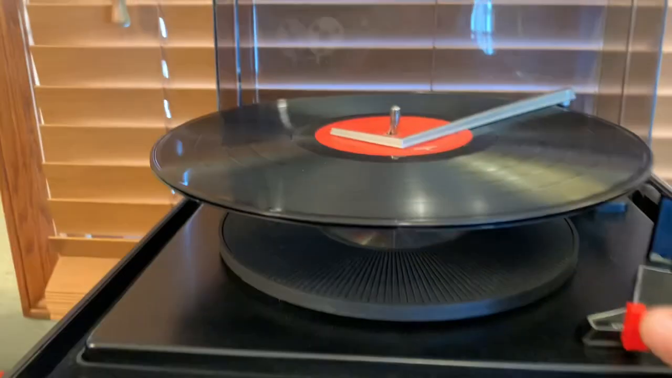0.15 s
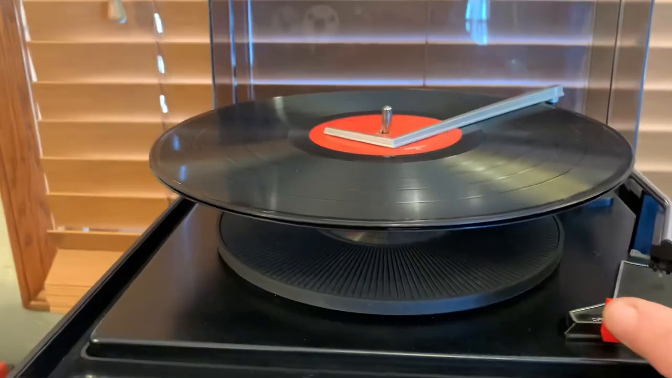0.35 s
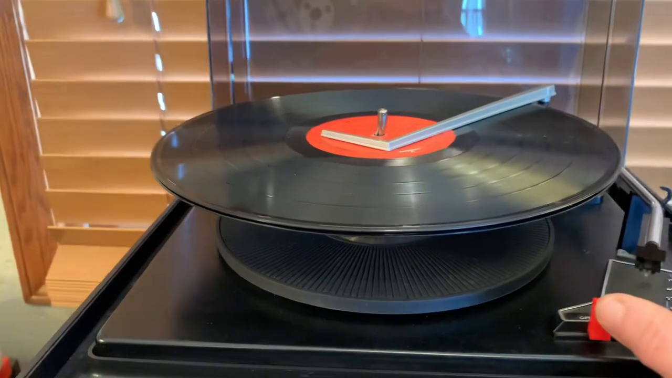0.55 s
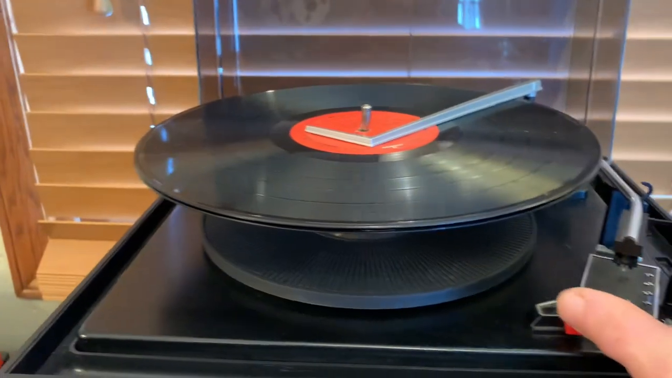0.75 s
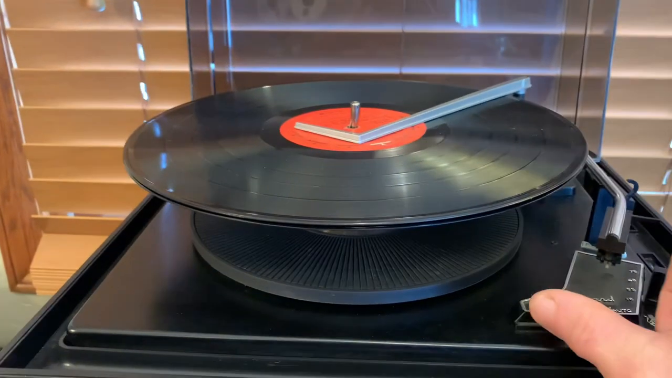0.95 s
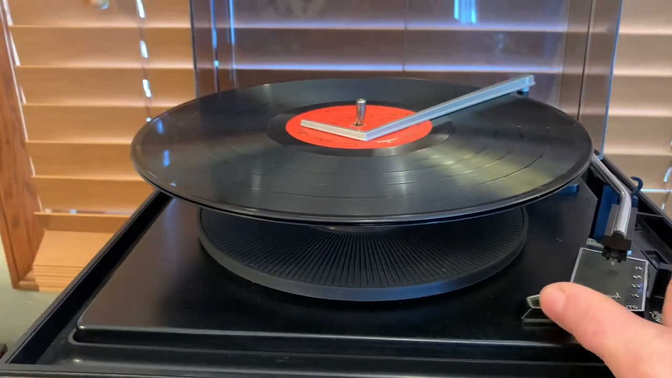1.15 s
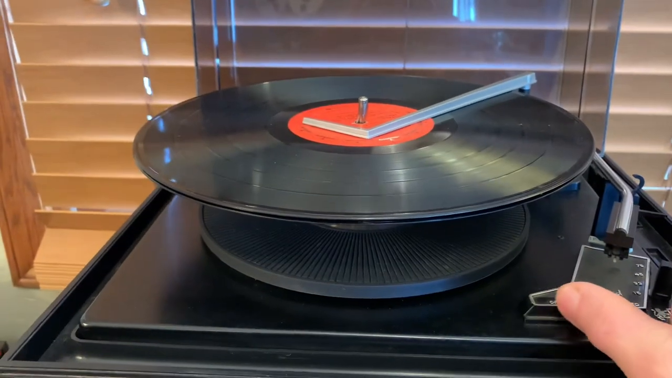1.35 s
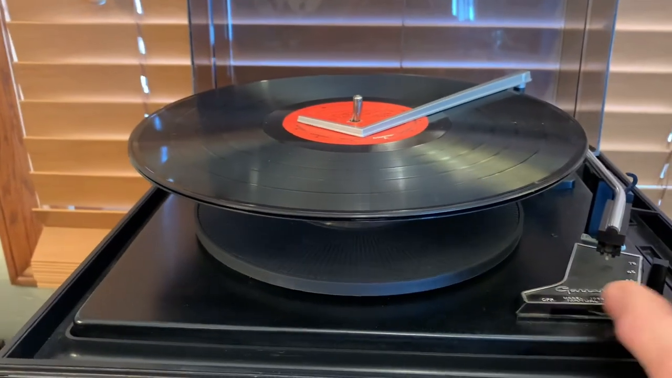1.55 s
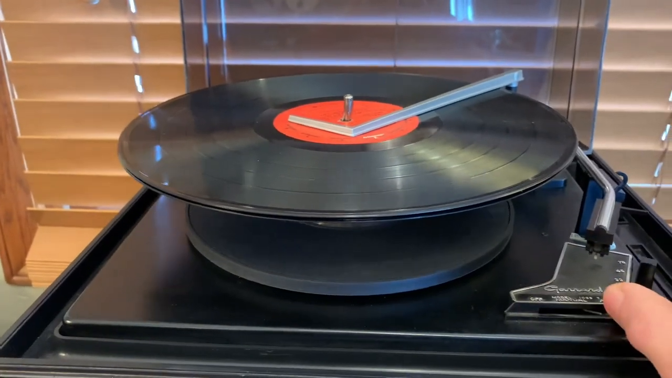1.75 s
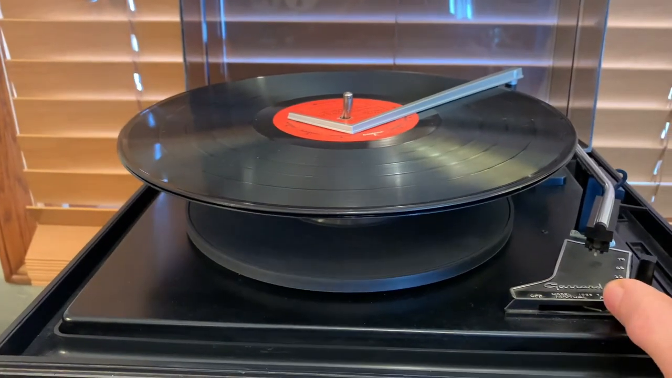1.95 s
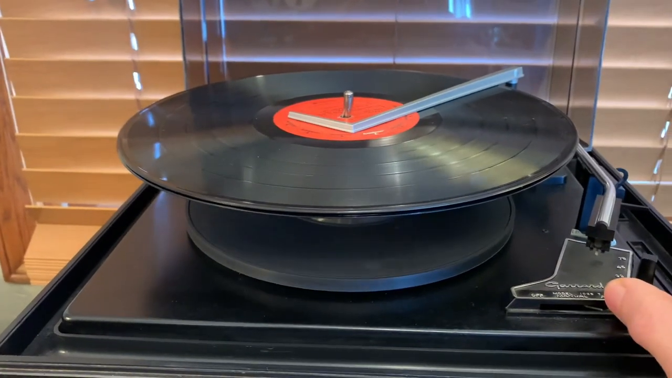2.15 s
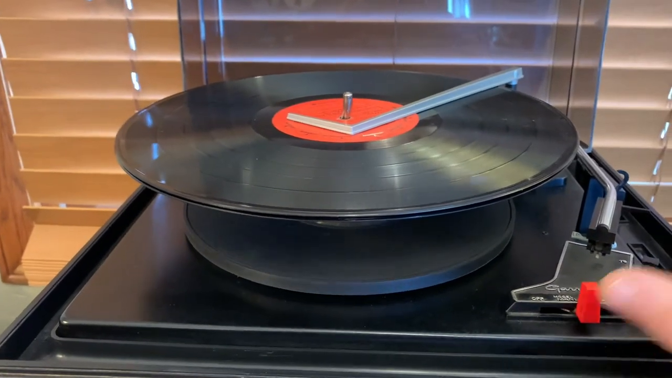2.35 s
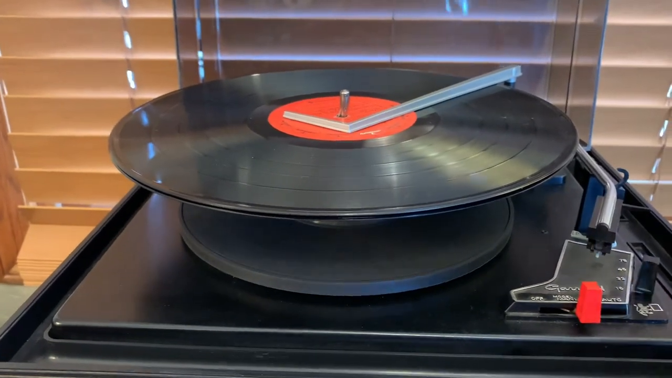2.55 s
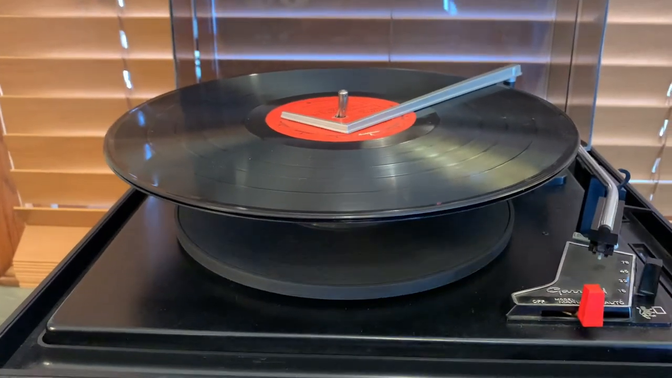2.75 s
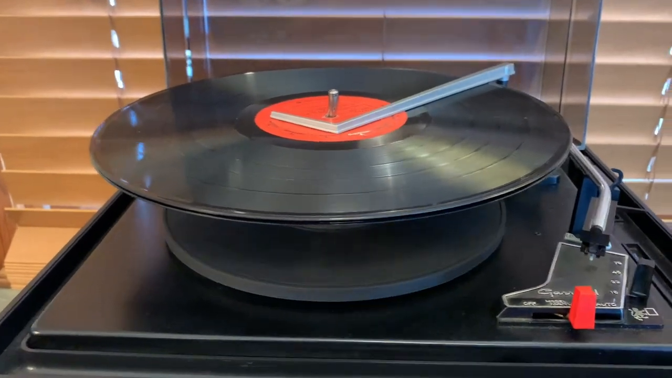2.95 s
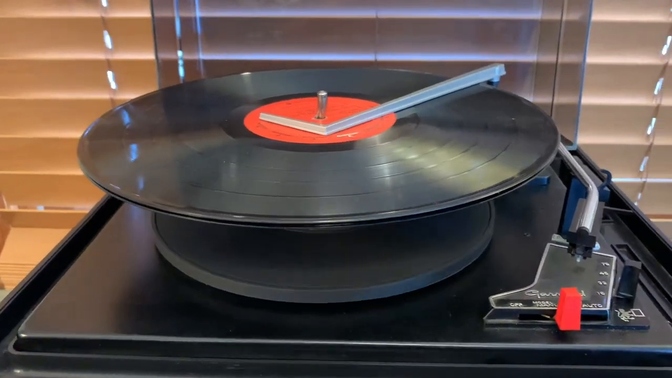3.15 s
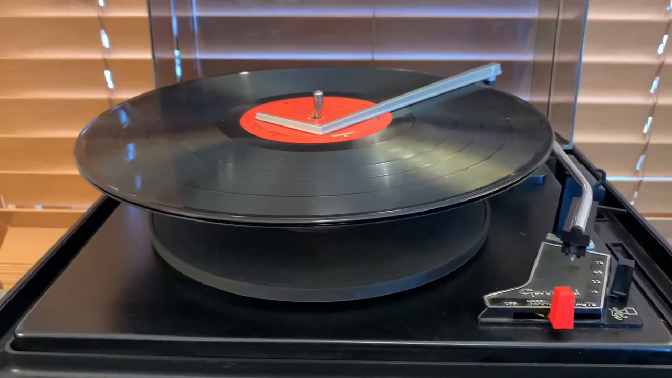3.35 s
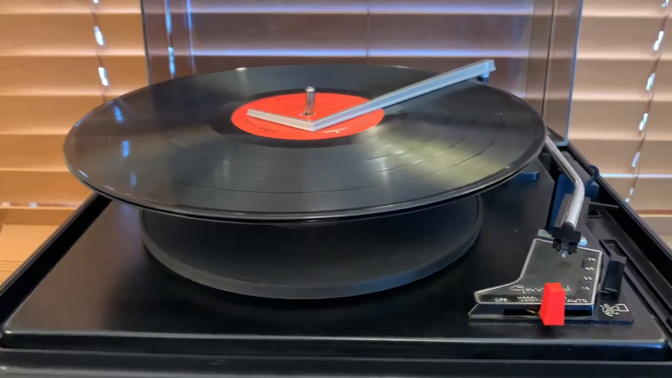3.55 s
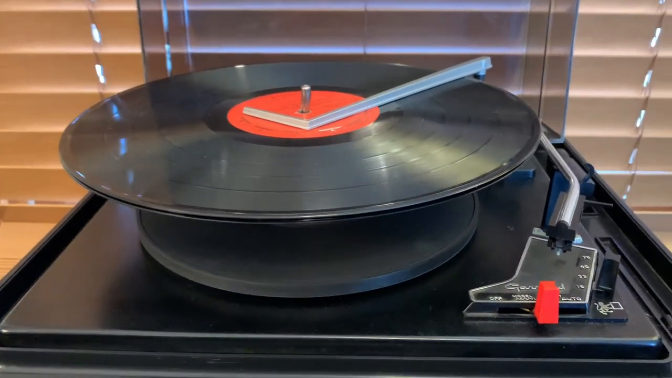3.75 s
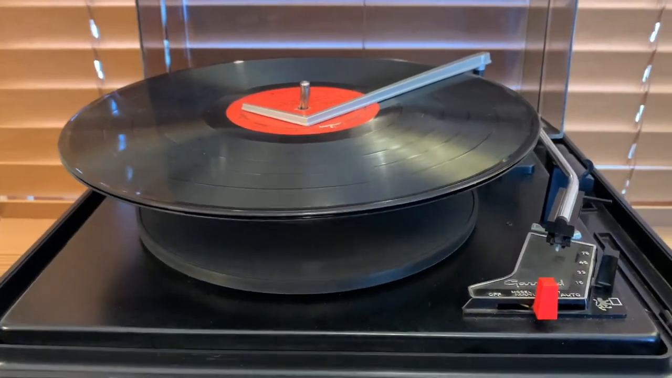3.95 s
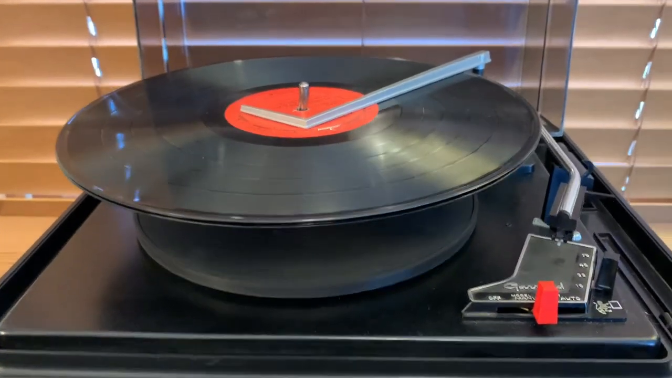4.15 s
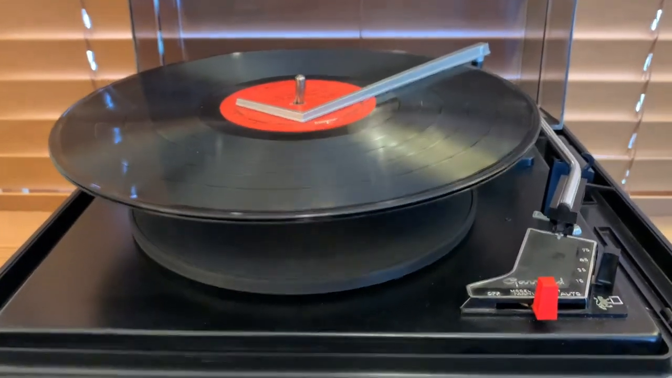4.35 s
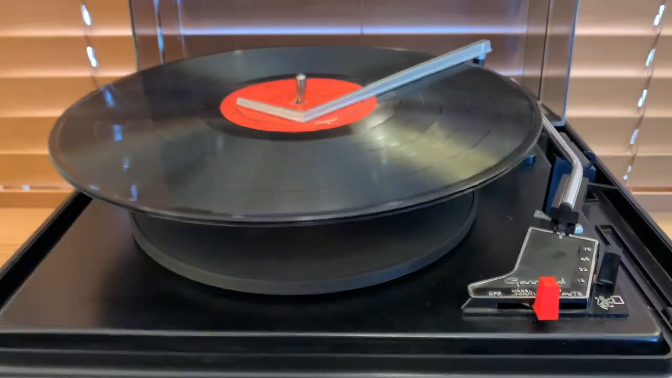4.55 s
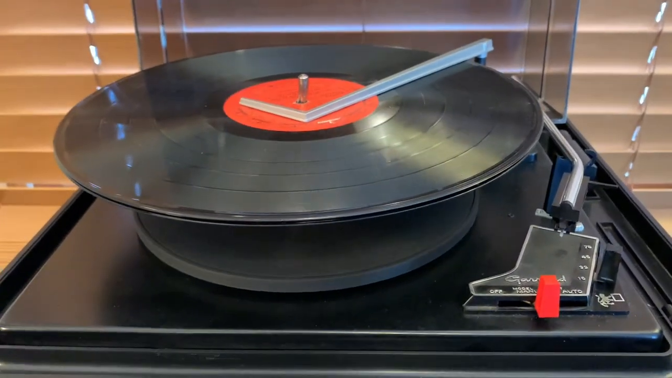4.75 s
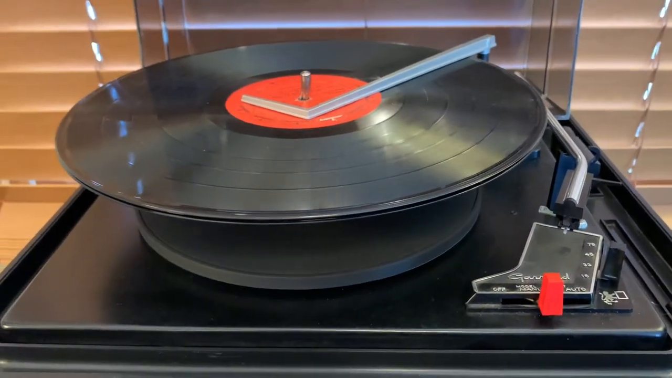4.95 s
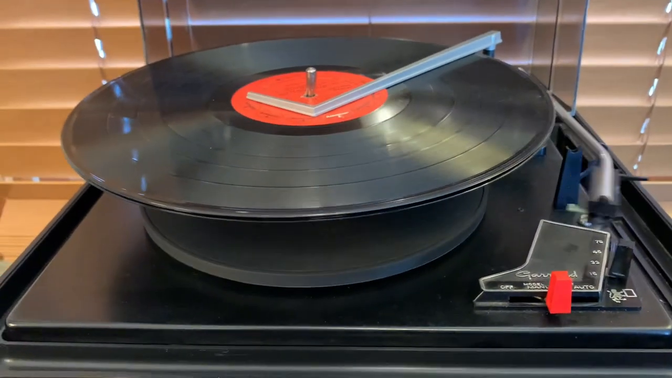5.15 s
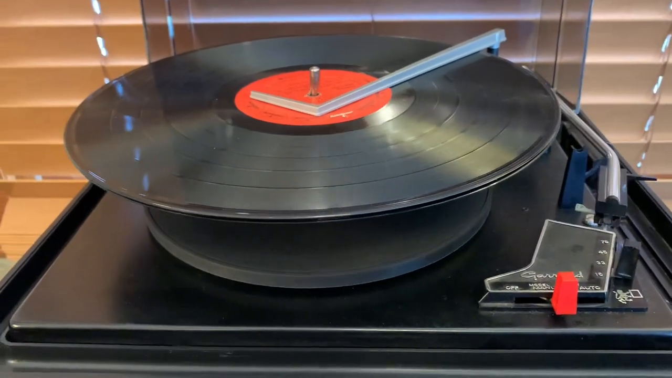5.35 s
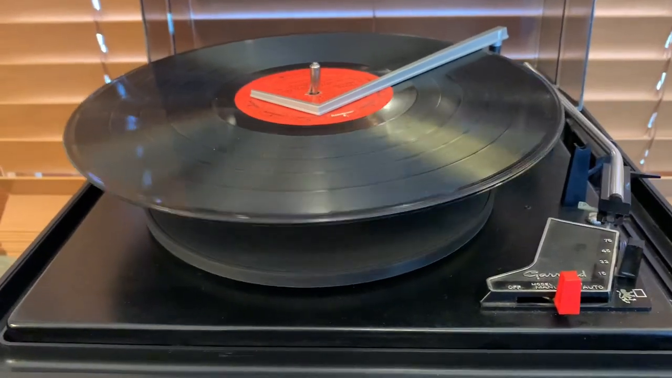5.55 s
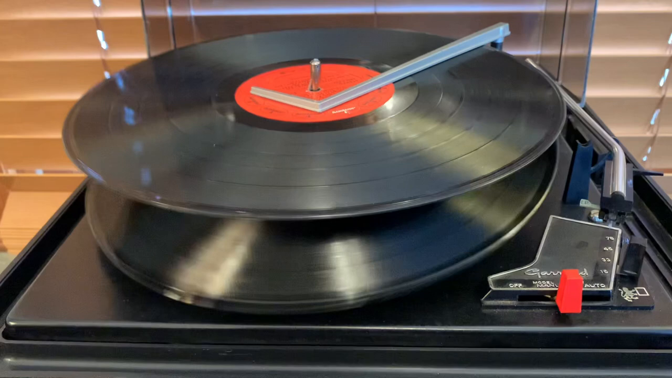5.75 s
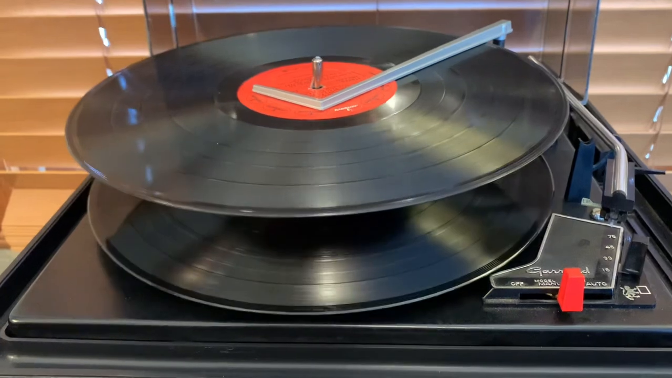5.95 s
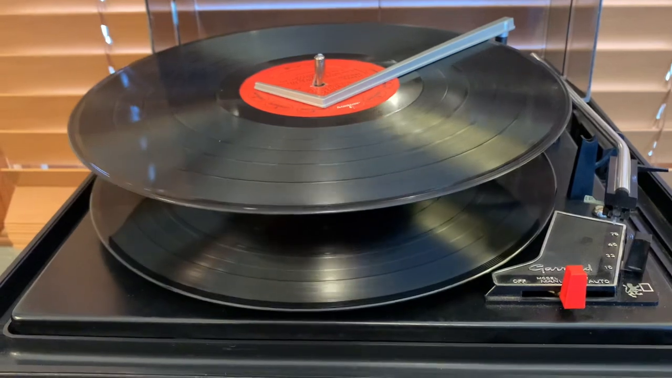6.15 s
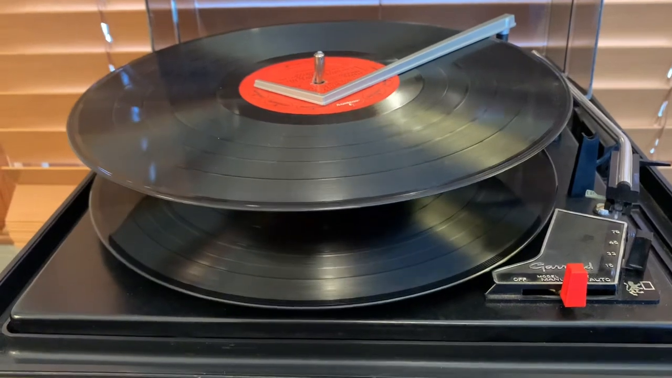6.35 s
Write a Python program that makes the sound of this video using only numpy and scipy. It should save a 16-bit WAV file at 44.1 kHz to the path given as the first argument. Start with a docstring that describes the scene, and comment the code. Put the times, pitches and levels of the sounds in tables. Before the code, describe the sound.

Steady soft hum with gentle rumble and faint hiss, heard close up indoors. Tiny mechanical ticks come first, then two hard plastic snaps of a lever, each a quick cluster of clicks. After a quieter stretch of dull ticks and barely audible rubbing, a vinyl disc falls onto the platter: small release clicks, a burst of hard clacks, a low airy push, a short roomy tail and a few faint taps.

```python
"""A record changer on a shelf in a small room, close to a phone, over hum, rumble, room air and phone hiss.
At first a buzz fades while the upper hum tones grow; damped ring pairs tick and soft noise rubs.
At 1.5 s and 2.2 s a finger works the slide switch: bursts of chatter ring its plastic modes.
More ticks and rubs follow; at 5.5 s the record drops and rattles: chatter rings the deck, sines push low.
A few faint ticks end it."""
import sys
import numpy as np
from scipy import signal
from scipy.fft import rfft, irfft, next_fast_len
from scipy.io import wavfile
from scipy.ndimage import uniform_filter1d, map_coordinates

SR = 44100
rng = np.random.default_rng(int(sys.argv[2]) if len(sys.argv) > 2 else 0)


def store_pcm(level_fs):
    """Save levels as 16-bit WAV."""
    pcm = np.round(np.clip(level_fs, -1, 1) * 32767).astype(np.int16)
    wavfile.write(sys.argv[1], SR, np.atleast_2d(pcm).T)


N = 282681

# Slide switch snaps at 1.5 s and 2.2 s; record falls and rattles flat from 5.5 s. Columns of both:
# (time [s], level [dB], body [dB before thump_db], snap [dB], chatter t60 [s], favoured mode [Hz], boost [dB])
SWITCH_CONTACTS = [(1.504, -10.5, -14, 0.5, .03, 1795, 6.5), (1.517, -22.5, -5.5, -4.5, .02, 2800, 5.5),
                   (1.527, -33, -9, -1.5, .11, 9700, 1.5), (1.578, -17, -18.5, -0.5, .022, 8720, 6.5),
                   (1.588, -24.5, -8.5, -13, .03, 3600, 13), (2.192, -27, -10, 1.5, .022, 5560, 5),
                   (2.200, -39, -0.5, -8, 0.071, 1795, 2), (2.247, -13.5, -23, 3, .025, 5560, 1),
                   (2.252, -17.5, -9, -2.5, .02, 1795, 6.5), (2.260, -25.5, -3.5, -3, .035, 2800, 8.5),
                   (2.286, -41, -14, -6, .07, 2800, 10)]
DROP_CONTACTS = [(5.535, -23, -3.5, -1, .03, 1430, 10), (5.543, -25.5, 0.5, -4, .04, 640, 7.5),
                 (5.556, -24, -5.5, -15.5, .045, 3550, 6), (5.579, -36.5, -5, 7.5, 0.021, 632, 7.5),
                 (5.603, -38, -7, 2, .042, 4570, 7), (5.624, -37, -1, -1, .015, 8360, -2),
                 (5.657, -35.5, 7.5, -16, .045, 1060, 9), (5.662, -27.5, -13, 4.5, 0.016, 4570, 9.5),
                 (5.7125, -11, -10, -5.5, .018, 8360, 2.5), (5.7265, -4, -12.5, -1.5, 0.0049, 8360, 1.5),
                 (5.739, -31.5, 10.5, -24, 0.036, 940, 6), (5.7675, -5.5, -19, 0, .03, 10100, 6.5),
                 (5.774, -10, -15.5, -3.5, .022, 4700, 11), (5.7955, -18, -6, 1.5, 0.013, 10100, 2),
                 (5.812, -19.5, -6, -1.5, 0.049, 4570, 1.5), (5.8325, -13, -16.5, -3, .022, 1860, 9.5),
                 (5.842, -21.5, -8.5, -6, 0.069, 1860, 9.5), (5.853, -20.5, -10.5, -15.5, .025, 1670, 16),
                 (5.898, -40, 4.5, -13, 0.047, 1060, -3), (5.952, -48, -5, -38, 0.034, 1805, 19)]
# Modes of deck, spindle and disc together: (frequency [Hz], width [Hz], gain [dB])
DECK_MODES = [(247, 65, 7.5), (326, 31, -0.5), (645, 26, 6), (943, 50, -3), (1056, 90, -3), (1415, 60, 1.5),
              (1652, 87, -5), (1870, 55, -0.5), (2825, 88, -2), (3600, 400, -4), (4675, 130, -2.5),
              (8330, 760, 0), (10070, 340, -1), (12300, 120, 0)]
# Modes of the plastic slide and its panel: (frequency [Hz], width [Hz], gain [dB])
SWITCH_MODES = [(194, 62, 19), (369.2, 18, 10), (607, 26, 6), (1041, 48, -1), (1210, 410, -3.5),
                (1795, 130, 3), (1950, 42, -0.5), (2861, 70, 1), (3600, 300, -10.5), (5560, 200, -5.5),
                (8600, 400, 1.5), (9700, 560, 1), (10760, 330, 4.5), (13200, 740, 5)]
# Low pushes of trapped air and landing: (time [s], frequency [Hz], level before the soft start [dB], t60 [s])
SLAP_PUSHES = [(5.719, 97, -23.5, 0.21), (5.74, 177.3, -34.5, 0.81), (5.778, 82.4, -31, 0.16),
               (5.859, 122, -19.5, 0.068)]
# Mechanism ticks: (time [s], ring peak [dB], ring [Hz], upper ring [Hz], crack re ring [dB])
TICK_TAPS = [(0.191, -46, 1570, 1910, -6), (0.197, -45, 3280, 4480, -15), (0.733, -53.5, 5900, 6230, -9),
             (.842, -43.5, 430, 524, -10.5), (1.151, -59.5, 2424, 2850, 14.5), (2.833, -43.5, 563, 1246, 1),
             (2.912, -37, 1273, 1590, -4.5), (3.089, -62, 2500, 2920, 8.5), (3.208, -32.5, 1252, 1460, -6),
             (3.578, -52.5, 2040, 3300, 7), (3.678, -59, 4780, 5240, 4), (3.799, -58.5, 2080, 2775, -15),
             (6.116, -53.5, 2880, 8780, 12), (6.193, -54, 1860, 2160, -16), (6.204, -48, 847, 3665, 4)]
# Faint taps on the low deck rings: (time [s], ring peak [dB], crack re ring [dB])
PING_TAPS = [(4.47, -57, -11), (5.985, -55.5, -22), (6.053, -44.5, -21), (6.311, -44.5, -15.5)]
# Deck rings set off by those taps: (frequency [Hz], width [Hz], relative level [dB])
PING_MODES = [(630, 13, 0), (634, 30, -13.5), (950, 45, -3.5), (1190, 50, -18.5)]
# Soft sliding contacts: (time [s], length [s], level before the swell [dB], centre [Hz], spread [octaves])
RUB_CONTACTS = [(0.052, 0.084, -67.5, 1190, 2.1), (1.38, 0.034, -74, 3770, 0.7),
                (2.497, 0.2, -82.5, 4000, 2), (4.026, 0.041, -72.5, 2400, 1.5),
                (4.159, 0.022, -73.5, 2960, 0.64), (4.273, 0.083, -74, 7800, 2.3)]
# Hum tones: (frequency [Hz], level [dB rms], width [Hz])
HUM_TONES = [(55.6, -54.5, 2), (58.6, -52, 1.3), (76.1, -60, 2.1), (136.1, -63.5, 5), (156.8, -53.5, 1.3),
             (184.2, -56, 3.4), (239.6, -56.5, 2.5), (260.9, -50, 1.5), (380.7, -63, 22)]
# Noise colours: (frequency [Hz], relative density [dB per Hz])
RUMBLE_COLOUR = [(25, -26), (40, -10), (55, -11), (100, 0), (200, -1), (290, -5.5), (340, -15),
                 (430, -12.5), (520, -34.5), (800, -57)]
AIR_COLOUR = [(260, -29), (450, -7), (573, -6), (1020, -10.5), (1100, -15), (1240, -11), (2060, -17.5),
              (2790, -30), (5000, -39.5), (6500, -72.5), (11000, -120)]
HISS_COLOUR = [(1500, -20), (3000, -6), (5000, -0.5), (7000, 1), (9500, 4.5), (12500, -6), (14500, -2.5),
               (15300, -29.5), (17000, -42)]
# Room air over time, before its bright band is added: (time [s], level [dB])
AIR_LEVEL_DB = [(0, -61.5), (.66, -64.5), (1.5, -63), (2.7, -64), (4.03, -62.5), (4.55, -66.5), (5.5, -66),
                (6.1, -63.5), (6.41, -64)]
# Bright band of the room air: (frequency [Hz], width [Hz], gain [dB])
AIR_BAND = (1100, 110, -1)
# Decay of the shelf nook; the whole room takes 3.3 times longer: (frequency [Hz], t60 [s])
NOOK_T60 = [(300, 0.33), (1000, 0.15), (3000, 0.13), (6000, 0.079), (12000, 0.048)]
# Stereo likeness of player and background: (frequency [Hz], left-right likeness [-1..1])
NEAR_LIKENESS = [(300, .92), (700, .8), (1200, .5), (2000, 0.4246), (5000, 0.039), (7000, 0.48), (14000, 1)]
FAR_LIKENESS = [(60, 1), (130, 0.61), (290, 0.64), (640, 0.033), (5000, 0.045), (8000, 0.97), (14000, 1)]
# Stereo balance of player and background: (frequency [Hz], left minus right [dB])
NEAR_BALANCE = [(300, -1.5), (1500, 1.5), (2500, 3.5), (4500, -5), (7000, 0.3)]
FAR_BALANCE = [(60, -1), (180, -2.5), (400, -0.5), (800, 0.75)]

BURST_SAMPLES, LEAD_SAMPLES, SPAN_SAMPLES = 2 ** 14, 256, 2 ** 15
RISE_SHARE = 0.078  # contact build-up time over its chatter t60
FAVOUR_OCTAVES = .08
TICK_WIDTH_HZ, TICK_Q = 30, 40  # ring width = base + pitch / TICK_Q
UPPER_RING_DB = -4.5  # re lower ring
CRACK_TOP_HZ, CRACK_TOP_PER_RING = 2830, 0.96  # crack is brighter on high-ringing parts
UPPER_HZ, UPPER_RISE_DB, UPPER_RISE_S = 200, 14, 0.87  # hum tones above UPPER_HZ grow at the start
BUZZ_HZ, BUZZ_DB, BUZZ_HOLD_S, BUZZ_FADE_DB_PER_S = 121, -52.5, 0.63, 56
LAG_S = .000215  # left treble behind right
TOP_HZ = 16600


def amp(db):
    """Gain of a level in dB."""
    return 10 ** (np.asarray(db) / 20)


def unit(x):
    """x at rms 1."""
    return x / np.sqrt(np.mean(x ** 2) + 1e-20)


def along(points, hz):
    """Interpolates (Hz, value) points on a log axis."""
    f, v = np.transpose(points)
    return np.interp(np.log(hz + 1), np.log(f + 1), v)


def curve(rows):
    """(s, dB) points as a gain per sample."""
    return amp(np.interp(np.arange(N) / SR, *np.transpose(rows)))


def filtered(x, response):
    """x times a complex response of frequency."""
    m = 2 * next_fast_len(x.shape[-1] // 2 + 4096)
    z = rfft(x, m) * response(np.fft.rfftfreq(m, 1 / SR))
    return irfft(z, m)[..., :x.shape[-1]]


def mode(f, hz, width_hz):
    """Response of a damped resonance, top gain 1."""
    return 1j * f * width_hz / (hz * hz - f * f + 1j * f * width_hz)


def noise(colour):
    """Two unrelated noises of one colour, rms 1."""
    return unit(filtered(rng.standard_normal((2, N)), lambda f: amp(along(colour, f))))


def ports(pair, likeness, balance):
    """Mixes two unrelated versions into left and right; the mid-side angle sets their likeness."""
    def mid_side(f):
        angle = np.arccos(np.clip(along(likeness, f), -1, 1)) / 2
        return np.array([np.cos(angle), np.sin(angle)])

    mid, side = filtered(pair, mid_side)
    left_right = np.array([mid + side, mid - side])
    return filtered(left_right, lambda f: amp(along(balance, f) * [[.5], [-.5]]))


def add(out, time_s, sound, wet_db):
    """Places a sound and a fresh reverb tail: noise whose frequencies die at their own speeds."""
    hz, t, z = signal.stft(rng.standard_normal((2, SPAN_SAMPLES // 2)), SR, nperseg=256)
    fall_db = -60 * t / along(NOOK_T60, hz)[:, None]
    decay = amp(fall_db) + amp(-8.5 + fall_db / 3.3)  # shelf nook, then whole room
    tail = signal.istft(z * decay, SR, nperseg=256)[1]
    tail = tail / np.linalg.norm(tail[0])
    wet = signal.fftconvolve(sound[:, :SPAN_SAMPLES // 2], tail, axes=1)[:, :SPAN_SAMPLES - 400]
    at = round(time_s * SR)
    out[:, at:at + sound.shape[1]] += sound
    out[:, at + 300:at + 300 + wet.shape[1]] += amp(wet_db) * wet


def clacks(contacts, modes, thump_db, wet_db):
    """Each contact chatters briefly and rings the modes at new strengths, most those near its favoured pitch."""
    out = np.zeros((2, N + 2 * SPAN_SAMPLES))
    t = np.clip(np.arange(BURST_SAMPLES) - LEAD_SAMPLES, 0, None) / SR
    for time_s, db, body_db, snap_db, t60_s, favoured_hz, favour_db in contacts:
        rise = 1 - np.exp(-(t / (RISE_SHARE * t60_s)) ** 2)
        shape = amp(-60 * (t / t60_s) ** 1.46) * rise
        rebounds = amp(3 * unit(uniform_filter1d(rng.standard_normal(BURST_SAMPLES), size=60)))
        z = rfft(rng.standard_normal((2, BURST_SAMPLES)) * shape * rebounds, 2 * BURST_SAMPLES)
        power = abs(z) ** 2
        even = np.sqrt(np.mean(power) / uniform_filter1d(power, size=150, axis=1))  # drives all pitches alike
        chatter = irfft(z * even)[:, :BURST_SAMPLES]
        colour = [(70, body_db + thump_db - 30.0), (300, body_db + thump_db), (900, body_db + 13.0),
                  (3000, 0.43), (6500, -1), (10000, snap_db - 1.0), (15000, snap_db - 7.5),
                  (16500, snap_db - 27.5)]
        spread_db, shifts = rng.normal(0, [[2.5], [.012]], (2, len(modes)))

        def response(f):
            rings = 0.5  # direct chatter
            for (hz, width_hz, gain_db), vary_db, shift in zip(modes, spread_db, shifts):
                nearness = np.exp(-(np.log2(hz / favoured_hz) / FAVOUR_OCTAVES) ** 2)
                gain = amp(gain_db + vary_db + favour_db * nearness)
                rings = rings + gain * mode(f, hz * (1 + shift), width_hz)
            return amp(along(colour, f)) * rings

        add(out, time_s - LEAD_SAMPLES / SR, amp(db) * filtered(chatter, response), wet_db)
    return out[:, :N]


def record_drop():
    """The released record hits and rattles, ringing deck, spindle and disc."""
    return clacks(DROP_CONTACTS, DECK_MODES, thump_db=11.5, wet_db=-8.5)


def slap():
    """Air trapped under the landing record: decaying low sines with a soft start."""
    out = np.zeros(N)
    for time_s, hz, db, t60_s in SLAP_PUSHES:
        t = np.clip(np.arange(N) / SR - time_s, 0, None)
        out += amp(db - 60 * t / t60_s) * (1 - np.exp(-t / 0.011)) * np.sin(2 * np.pi * hz * t)
    return out


def slide_switch():
    """The slide snaps over and back, ringing slide and panel."""
    return clacks(SWITCH_CONTACTS, SWITCH_MODES, thump_db=8.0, wet_db=-9)


def ticks():
    """A tick is a dull crack plus damped rings shaken by a brief scrape; a ping rings the deck's low tones."""
    out, t = np.zeros((2, N + 2 * SPAN_SAMPLES)), np.arange(BURST_SAMPLES) / SR
    taps = []
    for time_s, db, hz, upper_hz, crack_db in TICK_TAPS:
        lower = (hz, TICK_WIDTH_HZ + hz / TICK_Q, 0)
        upper = (upper_hz, TICK_WIDTH_HZ + upper_hz / TICK_Q, UPPER_RING_DB)
        taps.append((time_s, db, crack_db, [lower, upper]))
    taps += [(time_s, db, crack_db, PING_MODES) for time_s, db, crack_db in PING_TAPS]
    for time_s, db, crack_db, rings in taps:
        scrape = rng.standard_normal((2, BURST_SAMPLES)) * amp(-60 * t / 0.017)

        def ring_response(f):
            strike = np.exp(1j * np.angle(rfft(scrape, 2 * len(f) - 2)))  # flat spectrum, spread in time
            dull = 1 / (1 + 1j * f / (2 * rings[-1][0])) ** 3  # rolls off above the rings
            return strike * dull * sum(amp(g) * mode(f, hz, width) / width for hz, width, g in rings)

        ring = filtered(np.eye(1, BURST_SAMPLES), ring_response)
        blow = rng.standard_normal((2, BURST_SAMPLES)) * amp(-60 * t / 0.057) * (1 - np.exp(-t / 0.0026))
        top_hz = CRACK_TOP_HZ + CRACK_TOP_PER_RING * rings[0][0]
        crack = filtered(blow, lambda f: mode(f, 1200, 1400) / (1 + 1j * f / top_hz) ** 4)
        add(out, time_s - .001, amp(db) * ring / abs(ring).max(), wet_db=-21)
        add(out, time_s - .001, amp(db + crack_db) * crack / abs(crack).max(), wet_db=-7.5)
    return out[:, :N]


def rubs():
    """Sliding parts: a soft swell of uneven band noise."""
    out, t = np.zeros((2, N + 2 * SPAN_SAMPLES)), np.arange(SPAN_SAMPLES) / SR
    for time_s, length_s, db, hz, octaves in RUB_CONTACTS:
        grit = amp(4 * unit(uniform_filter1d(rng.standard_normal(SPAN_SAMPLES), 150)))
        band = filtered(rng.standard_normal((2, SPAN_SAMPLES)),
                        lambda f: np.exp(-(np.log2((f + 1) / hz) / octaves) ** 2))
        swell = np.sin(np.pi * np.clip(t / length_s, 0, 1))
        add(out, time_s, amp(db) * unit(band * grit) * swell, wet_db=2.0)
    return out[:, :N]


def tone(hz, width_hz):
    """A sine whose phase wanders and whose strength wavers a little."""
    t = np.arange(N) / SR
    drift = np.cumsum(rng.standard_normal(N)) * np.sqrt(2 * np.pi * width_hz / SR)
    waver = map_coordinates(rng.standard_normal(64), [t * 6])
    return np.sqrt(2) * amp(1.6 * waver) * np.sin(2 * np.pi * hz * t + uniform_filter1d(drift, 1500))


def hum():
    """Wavering tones over a swelling noise rumble; the upper tones grow at first while a buzz fades."""
    t = np.arange(N) / SR
    rise = amp(-UPPER_RISE_DB * np.clip(1 - t / UPPER_RISE_S, 0, 1))
    tones = np.zeros(N)
    for hz, db, width_hz in HUM_TONES:
        tones += amp(db) * tone(hz, width_hz) * (rise if hz > UPPER_HZ else 1)
    buzz_db = BUZZ_DB - BUZZ_FADE_DB_PER_S * np.clip(t - BUZZ_HOLD_S, 0, None)
    tones += amp(buzz_db) * tone(BUZZ_HZ, 2.0)
    swell = amp(1.2 * map_coordinates(rng.standard_normal(64), [t * 4]))
    rumble = amp(-47.5) * swell * noise(RUMBLE_COLOUR)
    return rumble + tones * [[1], [0]]  # tones in mid only


def room_air():
    """Coloured room noise with one brighter band and a slowly moving level."""
    hz, width_hz, db = AIR_BAND
    air = filtered(noise(AIR_COLOUR), lambda f: 1 + amp(db) * mode(f, hz, width_hz))
    return curve(AIR_LEVEL_DB) * air


def scene():
    """The player near the phone, the room around it."""
    player = record_drop() + slide_switch() + ticks() + rubs()
    background = hum() + room_air()
    near = ports(player, NEAR_LIKENESS, NEAR_BALANCE)
    return near + slap() + ports(background, FAR_LIKENESS, FAR_BALANCE)


def record(dry):
    """The phone adds hiss, delays left treble against right and cuts at TOP_HZ."""
    hissy = dry + ports(amp(-85.5) * noise(HISS_COLOUR), FAR_LIKENESS, FAR_BALANCE)

    def response(f):
        turn = np.pi * np.clip(f * LAG_S - 1, 0, None)  # bass stays in step
        return np.exp(1j * turn * [[-1], [1]]) * (f < TOP_HZ)

    return filtered(hissy, response)


dry = scene()
out = record(dry)
store_pcm(out)
```